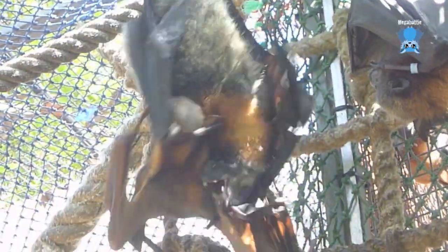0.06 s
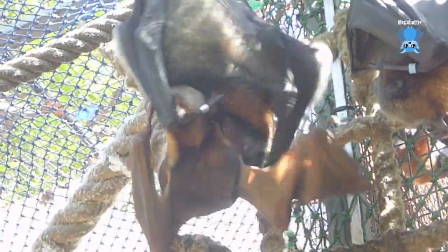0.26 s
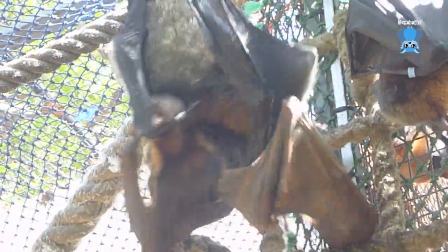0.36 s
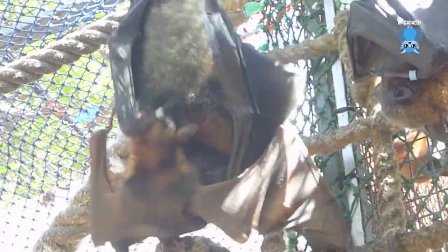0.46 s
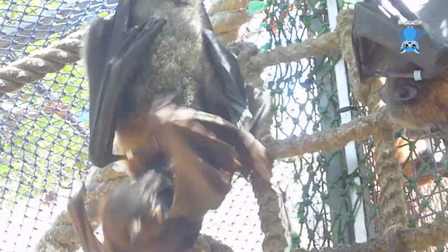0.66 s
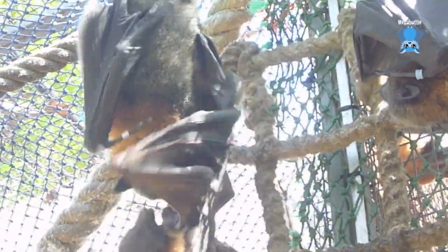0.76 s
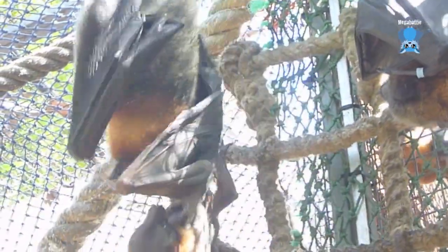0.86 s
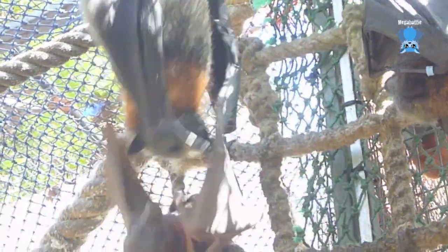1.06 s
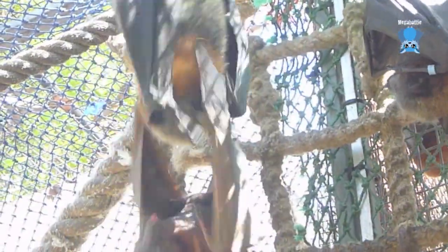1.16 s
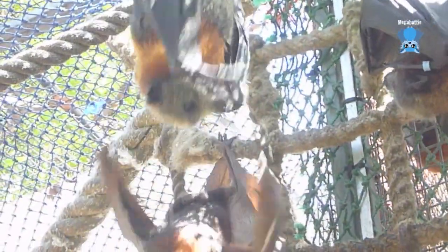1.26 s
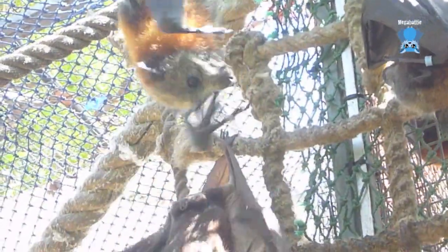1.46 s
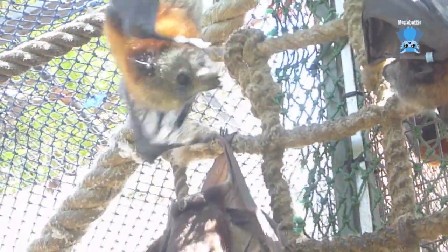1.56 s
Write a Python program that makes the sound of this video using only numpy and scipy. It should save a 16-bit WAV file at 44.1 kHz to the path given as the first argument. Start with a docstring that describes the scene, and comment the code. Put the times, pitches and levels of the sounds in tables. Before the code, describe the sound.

Two fruit bats squabble close to the microphone in an outdoor aviary. A hoarse screech starts with a soft knock, then breaks into rapid chirps and thin squeals. A faint bird whistle and distant traffic hum lie behind.

```python
"""Two fruit bats squabble close to the microphone in an open-air mesh aviary. One rattles off short
chirps, each a snap that rings its throat under a few cycles of tone; the other screeches in hoarse,
breathy pulses, then squeals in gliding notes. Two near echoes and a short tail follow the calls.
A soft knock lands as the squabble starts. Far off a bird whistles, and air and traffic hum."""
import sys
import numpy as np
from scipy import signal
from scipy.fft import rfft, irfft, next_fast_len
from scipy.io import wavfile
from scipy.ndimage import uniform_filter1d, map_coordinates

SR = 44100
rng = np.random.default_rng(int(sys.argv[2]) if len(sys.argv) > 2 else 0)


def store_pcm(level_fs):
    """Save levels as 16-bit WAV."""
    pcm = np.round(np.clip(level_fs, -1, 1) * 32767).astype(np.int16)
    wavfile.write(sys.argv[1], SR, np.atleast_2d(pcm).T)


N = 70560

# First bat, close to the microphone, one row a chirp:
# (time [s], level [dB], pitch [Hz], hold [s], 2nd partial over 1st [dB], 3rd partial over 1st [dB])
CHIRPS = [(0.22, -40, 2140, 0.0013, -7.5, 6.5), (0.3092, -44.5, 2124, 0.00069, 5.5, 16.5),
          (.3424, -37, 2162, .0015, 2, 17.5), (0.345, -40, 2103, 0.002, 9, 18),
          (0.3886, -33.5, 2327, .0025, -0.5, 1.5), (0.4332, -37.5, 2166, 0.0016, 4.5, 15.5),
          (.4747, -39, 2073, 0.0024, 7.5, 14), (.494, -33.5, 2450, 0.0019, 6.5, 6),
          (0.519, -36, 2457, 0.0016, 7.5, 5)]
# The resonances of its throat: (frequency [Hz], width [Hz], gain [dB])
THROAT_RESONANCES = [(2780, 230, 4), (4800, 870, -4.5), (6860, 700, 2)]


def bat_chirps(rise_s=.0005, t60_s=.009, sag_per_s=3, snap_db=30, grit_db=11):
    """A snap and a puff of grit ring the throat while a few cycles of three partials swell and die."""
    tones, drive = np.zeros(N), np.zeros(N)
    t = np.arange(SR // 20) / SR
    for onset_s, db, hz, hold_s, second_db, third_db in CHIRPS:
        start = round(onset_s * SR)
        decay = amp(-60 * np.maximum(t - hold_s, 0) / t60_s)
        envelope = amp(db) * (1 - np.exp(-t / rise_s)) * decay
        phase = 2 * np.pi * hz * (t - sag_per_s * t * t / 2)
        tone = np.sin(phase) + amp(second_db) * np.sin(2 * phase) + amp(third_db) * np.sin(3 * phase)
        tones[start:][:len(t)] += envelope * tone
        drive[start:][:len(t)] += amp(grit_db) * envelope * rng.standard_normal(len(t))
        drive[start] += amp(db + snap_db)
    return tones + filtered(drive, lambda f: sum(
        (-1) ** k * amp(db) * peak(f, hz, width) for k, (hz, width, db) in enumerate(THROAT_RESONANCES)))


# Second bat, also close, its voice held between pulses: (time [s], pitch [Hz], level [dB])
SCREECH_GLIDE = [(.221, 1443, -45.5), (.236, 1429, -54), (.246, 1370, -53), (.268, 1457, -39),
                 (.282, 1503, -55), (.29, 1542, -53), (.298, 1652, -51.5), (.304, 1750, -51.5),
                 (.316, 1960, -66)]
# Its harmonics, from the first up: (gain [dB])
SCREECH_HARMONICS = [-20, 0, -16, -18.5]
# Its pulses: (time [s], half-width [s], voice level [dB], rasp level [dB])
SCREECH_PULSES = [(0.2227, 0.00097, -42, -57), (0.2348, 0.00087, -40.5, -60), (.239, 0.00088, -44, -52.5),
                  (.247, 0.0022, -37, -48), (0.2514, .0008, -48.5, -33.5), (0.2535, .001, -50, -30),
                  (0.2581, 0.0013, -43, -35), (.260, 0.00089, -38.5, -29), (0.2648, 0.001, -35, -30),
                  (0.2681, 0.0013, -30.5, -29.5), (0.2745, 0.0015, -37.5, -35),
                  (0.2776, .001, -32.5, -31.5), (0.284, .001, -51.5, -48), (0.2883, 0.002, -35.5, -36.5),
                  (0.2916, 0.00087, -48.5, -29)]


def bat_screech(rasp_hz=6410, held_rasp_db=-11.5, held_breath_db=4.5, pulse_breath_db=-3.5):
    """A rough rising voice, thrown out in pulses, with breath around it and a rasp in the treble."""
    t = np.arange(N) / SR
    gate, pitch_hz, held_db = curves(SCREECH_GLIDE)
    centre_s, width_s, voice_db, rasp_db = np.transpose(SCREECH_PULSES)[:, :, None]
    pulses = np.exp(-((t - centre_s) / width_s) ** 2)
    held = gate * amp(held_db)
    pulsed = (amp(voice_db) * pulses).sum(0)
    rasp_gain = amp(held_rasp_db) * held + (amp(rasp_db) * pulses).sum(0)
    breath_gain = amp(held_breath_db) * held + amp(pulse_breath_db) * pulsed
    rasp = np.sqrt(2) * np.sin(2 * np.pi * rasp_hz * t + wobble(1500))
    tone = bat_voice(pitch_hz, SCREECH_HARMONICS, roughness=.28)
    return (held + pulsed) * tone + breath_gain * bat_breath() + rasp_gain * rasp


# The same bat squealing, one list a note: (time [s], pitch [Hz], level [dB], 2nd partial over 1st [dB])
SQUEAL_NOTES = [
    [(.318, 1660, -56, 3.5), (.33, 1930, -59, 5), (.342, 2190, -56, 0), (.35, 2110, -66, -1)],
    [(.362, 1984, -58, 13), (.372, 2176, -68, 4), (.386, 2368, -49, -15), (.405, 2343, -62, -4),
     (.42, 2430, -59.5, -12), (.432, 2630, -55, -14)],
    [(.438, 2784, -57.5, -14.5), (.446, 2837, -40, -21), (.451, 2725, -63, -9), (.461, 2667, -41, -16.5),
     (.47, 2678, -52.5, -9), (.485, 2746, -54, -8), (.492, 2734, -48, -11), (.4965, 2740, -35.5, -6.5),
     (.4987, 2730, -50, -13.5), (.501, 2562, -40, -11.5), (.506, 2827, -39.5, -14), (.515, 2745, -53, -7.5),
     (.523, 2850, -44.5, -12), (.528, 2608, -56, 0), (.535, 2727, -44.5, -10), (.538, 2750, -56, -10),
     (.541, 2665, -45, -10), (.546, 2353, -47, -12), (.55, 2010, -60.5, 14.5), (.556, 1850, -51, -9),
     (.562, 1750, -58.5, -4)],
]


def bat_squeal(third_db=-8, breath_db=-3):
    """Thin, scratchy notes of voice and breath glide among the chirps."""
    out = np.zeros(N)
    for note in SQUEAL_NOTES:
        gate, pitch_hz, db, second_db = curves(note)
        tone = bat_voice(pitch_hz, [0, second_db, third_db], roughness=.45)
        out += gate * amp(db) * (tone + amp(breath_db) * bat_breath())
    return out


def bat_voice(pitch_hz, harmonics_db, roughness):
    """Harmonics of an unsteady pitch; each flutters in strength and phase."""
    phase = 2 * np.pi * np.cumsum(pitch_hz) / SR
    out = np.zeros(N)
    for k, db in enumerate(harmonics_db, start=1):
        flutter = 1 + roughness * wobble(500) / 2
        out += np.sqrt(2) * amp(db) * flutter * np.sin(k * (phase + roughness * wobble(300)))
    return out


# The second bat's breath at close range: (frequency [Hz], relative level [dB])
BREATH_SPECTRUM = [(1200, -23.5), (1900, -4.5), (2600, 0), (3600, -1.5), (4500, -13), (5500, -9),
                   (7500, -8.5)]


def bat_breath(low_cut_hz=900):
    """Air hisses through the throat."""
    return noise(lambda f: amp(along(BREATH_SPECTRUM, f)) * (f > low_cut_hz))


# Reflections from near surfaces of the aviary: (delay [s], gain [dB])
NEAR_ECHOES = [(.0022, -19), (.0047, -17)]
# Scattered sound in the aviary: (frequency [Hz], time to fall 60 dB [s])
TAIL_DECAY = [(2000, 0.2), (4500, 0.18), (6500, 0.23)]


def aviary(calls, tail_db=-12, tail_delay_samples=150):
    """The calls reach the microphone directly, then as two near echoes and a short scattered tail."""
    hz, t, spectra = signal.stft(rng.standard_normal(SR // 4), SR, nperseg=128)
    decay = amp(-60 * t / along(TAIL_DECAY, hz)[:, None])
    tail = signal.istft(spectra * decay, SR, nperseg=128)[1]
    near = filtered(calls, lambda f: 1 + sum(
        amp(db) * np.exp(-2j * np.pi * f * delay_s) for delay_s, db in NEAR_ECHOES))
    scattered = signal.fftconvolve(np.pad(calls, (tail_delay_samples, 0)), tail / np.linalg.norm(tail))
    return near + amp(tail_db) * scattered[:N]


def knock(onset_s=.221, hz=314, db=-46.5, t60_s=.1, slap_hz=700, slap_db=-3):
    """A soft low knock and a dull slap die away together."""
    t = np.arange(N) / SR - onset_s
    envelope = (t > 0) * amp(db - 60 * np.maximum(t, 0) / t60_s)
    slap = amp(slap_db) * noise(lambda f: peak(f, slap_hz, 2 * slap_hz))
    return envelope * (np.sin(2 * np.pi * hz * t) + slap)


# A bird far from the microphone: (time [s], pitch [Hz], level [dB])
BIRD_NOTE = [(0, 1458, -66), (.1, 1480, -60.5), (.175, 1502, -58.5), (.25, 1480, -59), (.3, 1425, -57.5),
             (.33, 1356, -63.5)]


def bird_whistle(waver_db=.63):
    """A far bird holds one pure note that lifts a little and falls."""
    gate, hz, db = curves(BIRD_NOTE)
    phase = 2 * np.pi * np.cumsum(hz) / SR
    return gate * np.sqrt(2) * amp(db + waver_db * wobble(30)) * np.sin(phase)


# Open air around the aviary: (frequency [Hz], relative level [dB])
AIR_SPECTRUM = [(20, -25.5), (40, -8.5), (60, -5.5), (110, -6), (220, -4), (500, -6), (1300, -11.5),
                (4200, -17.5), (6000, -22.5), (7000, -24.5), (7500, -26)]
# That air at the microphone: (time [s], level [dB])
AIR_LEVEL = [(0, -53.5), (.3, -54.5), (.7, -54), (1.2, -54), (1.6, -55)]
# Traffic in the distance: (time [s], level [dB])
TRAFFIC_LEVEL = [(0, -59), (.3, -61), (.8, -65.5), (1.0, -67.5), (1.6, -70)]


def air_and_traffic(waver_db=.45, hum_hz=76.5, resonance_width_hz=18):
    """A broad outdoor wash lies over the wavering, fading hum of distant traffic."""
    _, air_db = curves(AIR_LEVEL)
    _, hum_db = curves(TRAFFIC_LEVEL)
    wash = amp(air_db + waver_db * wobble(5.88)) * noise(lambda f: amp(along(AIR_SPECTRUM, f)))
    hum = amp(hum_db) * noise(lambda f: peak(f, hum_hz, resonance_width_hz) ** 2)
    return wash + hum


def amp(db):
    """Gain of a level in dB."""
    return 10 ** (np.asarray(db) / 20)


def along(points, hz):
    """(frequency [Hz], value) points, interpolated on a log frequency axis."""
    point_hz, values = np.transpose(points)
    return np.interp(np.log(hz + 1), np.log(point_hz + 1), values)


def curves(rows):
    """A soft gate, open from the first row's time to the last, then each later column per sample."""
    times, *columns = np.transpose(rows)
    t = np.arange(N) / SR
    gate = uniform_filter1d(((t >= times[0]) & (t <= times[-1])) * 1., size=88)
    return [gate] + [np.interp(t, times, column) for column in columns]


def wobble(rate):
    """A smooth random curve, rate knots a second."""
    return map_coordinates(rng.standard_normal(int(N * rate / SR) + 4), [np.arange(N) * rate / SR])


def filtered(x, response):
    """x through a complex response of frequency."""
    size = next_fast_len(N + SR // 2)
    return irfft(rfft(x, size) * response(np.fft.rfftfreq(size, 1 / SR)), size)[..., :N]


def peak(f, hz, width_hz):
    """The response of one resonance, 1 at its centre."""
    return 1j * f * width_hz / (hz * hz - f * f + 1j * f * width_hz)


def noise(response):
    """Coloured noise of rms 1."""
    x = filtered(rng.standard_normal(N), response)
    return x / np.sqrt(np.mean(x ** 2) + 1e-20)


def scene():
    """Close bats in the aviary and a knock, with bird, air and traffic behind, in mono."""
    bats = aviary(bat_chirps() + bat_screech() + bat_squeal())
    return (bats + bird_whistle() + knock() + air_and_traffic())[None]


# The microphone's falling treble: (frequency [Hz], gain [dB])
MICROPHONE_ROLLOFF = [(6800, 0.5), (7200, -8), (7550, -17.5), (7900, -31.5), (8500, -37)]


def record(dry, notch_hz=5416, notch_width_hz=520, top_hz=8576):
    """The microphone has a narrow notch and a treble that falls away, then cuts off."""
    def response(f):
        notch = 1 - .97 * peak(f, notch_hz, notch_width_hz)
        return notch * amp(along(MICROPHONE_ROLLOFF, f)) * (f < top_hz)
    return filtered(dry, response)


dry = scene()
out = record(dry)
store_pcm(out)
```